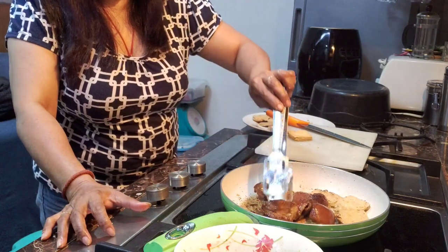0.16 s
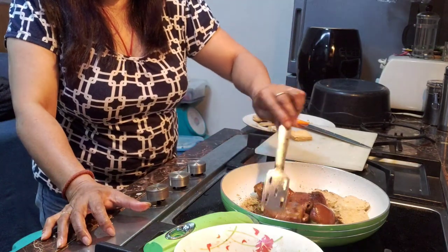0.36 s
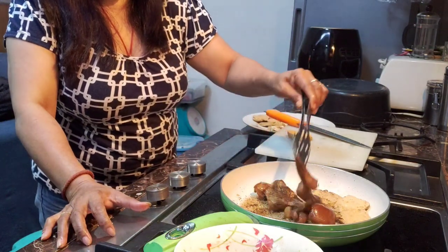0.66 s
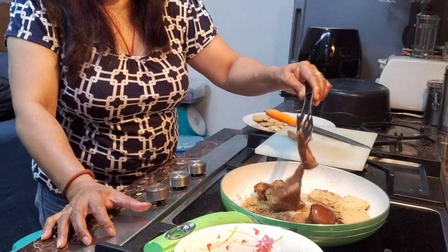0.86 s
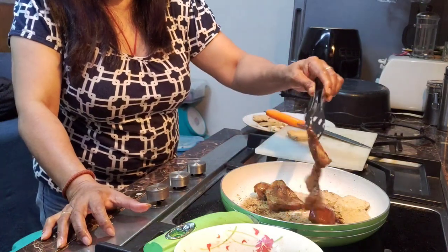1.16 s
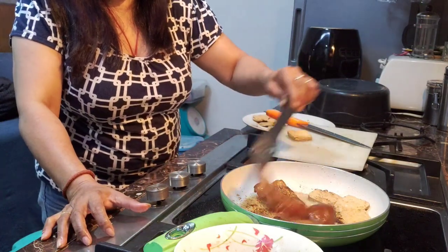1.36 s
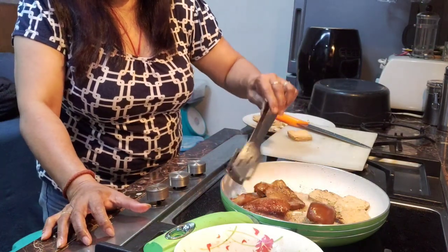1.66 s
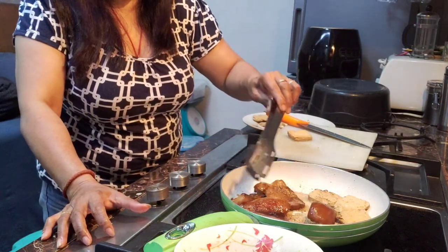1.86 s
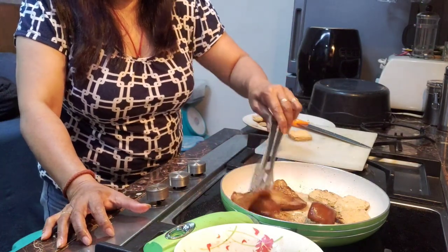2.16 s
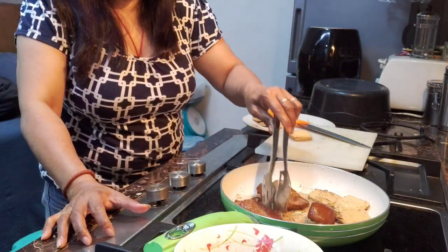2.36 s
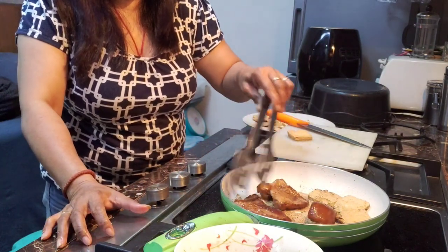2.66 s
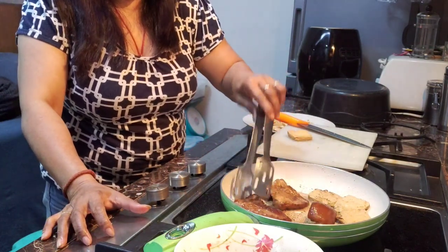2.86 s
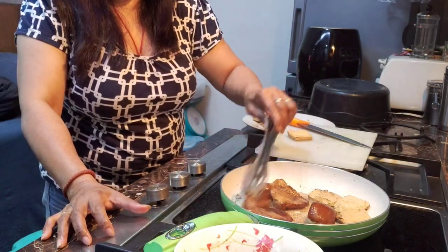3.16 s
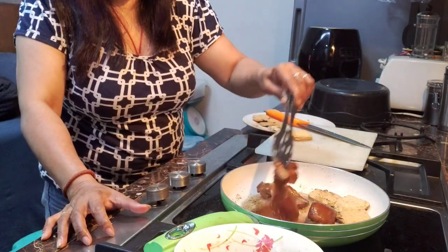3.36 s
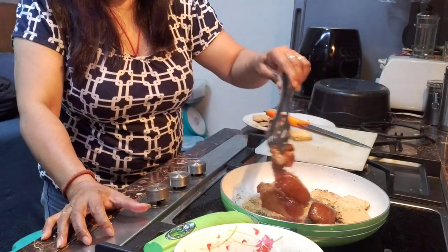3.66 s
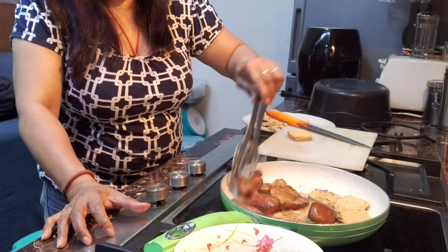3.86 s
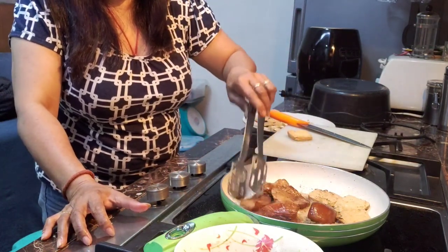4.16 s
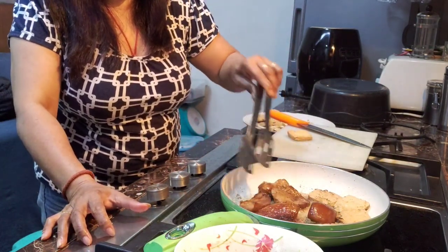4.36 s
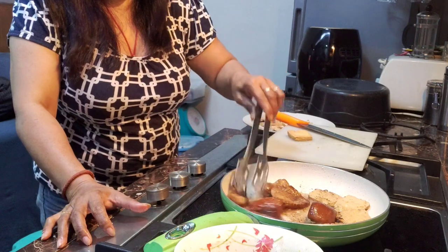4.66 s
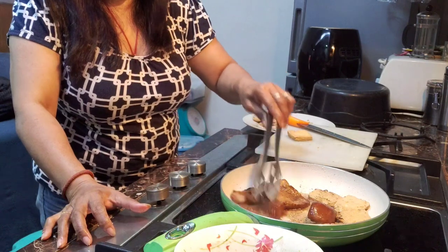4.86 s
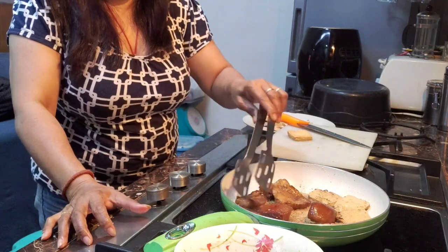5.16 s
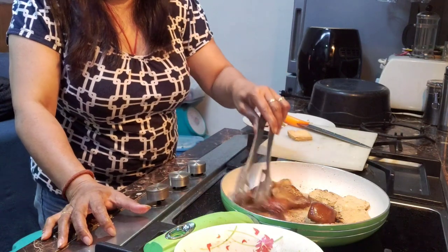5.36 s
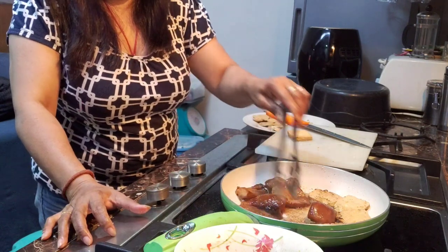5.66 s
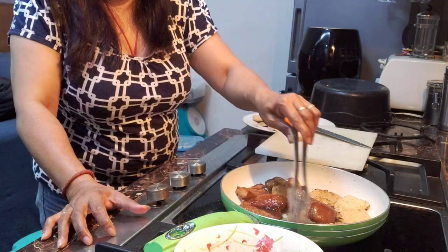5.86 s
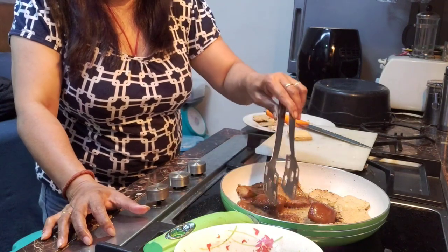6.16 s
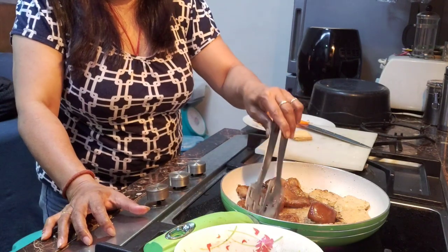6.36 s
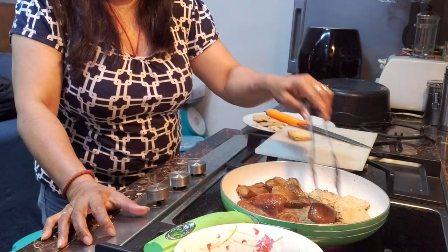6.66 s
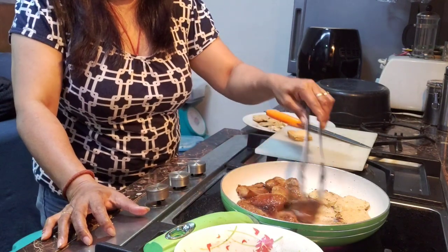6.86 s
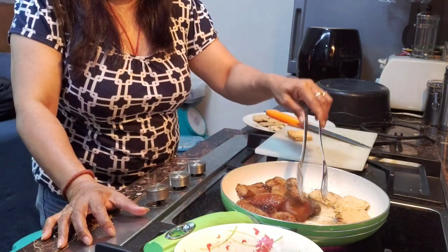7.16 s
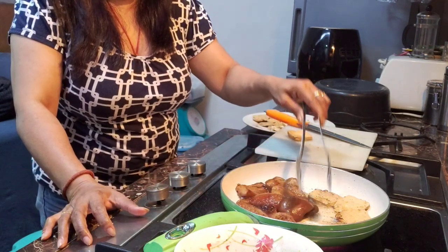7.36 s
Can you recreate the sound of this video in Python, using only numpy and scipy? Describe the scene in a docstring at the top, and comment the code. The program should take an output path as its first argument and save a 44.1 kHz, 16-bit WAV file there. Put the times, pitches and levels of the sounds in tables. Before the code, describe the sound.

Steel tongs clink and knock on a pan of frying food as the hissing oil settles to a soft sizzle.

```python
"""Steel tongs turn food in a frying pan in a small kitchen. They knock the pan four times, making it
ring, and in between they lightly touch it, scrape it and squeak on its enamel. The oil hisses and
spits as tiny steam bubbles burst, loudly at first, then softly. Behind it all is the low hum of
appliances, and the room adds a short echo."""
import sys
import numpy as np
from scipy import signal
from scipy.fft import rfft, irfft, next_fast_len
from scipy.io import wavfile
from scipy.ndimage import uniform_filter1d

SR = 44100
rng = np.random.default_rng(int(sys.argv[2]) if len(sys.argv) > 2 else 0)


def to_wav(s):
    """Save 16-bit WAV."""
    ch = np.atleast_2d(s).T  # columns
    pcm = np.round(np.clip(ch, -1, 1) * 32767)  # PCM
    wavfile.write(sys.argv[1], SR, pcm.astype(np.int16))


N = 330750  # 7.5 seconds


def gain_of(db):
    """Turns decibels into a number to multiply by."""
    return 10 ** (np.asarray(db) / 20)


def unit_level(x):
    """Scales a signal to an average power of 1."""
    return x / np.sqrt(np.mean(x ** 2) + 1e-20)


def value_at(points, hz):
    """Reads between the rows of a (pitch, value) table."""
    pitches, values = np.transpose(points)
    return np.interp(np.log(hz + 1), np.log(pitches + 1), values)


def add(mix, start_s, sound):
    """Mixes a sound in at its start time."""
    part = mix[..., round(start_s * SR):][..., :sound.shape[-1]]
    part += sound[..., :part.shape[-1]]


def resonate(x, hz, width_hz):
    """Rings at one pitch; a smaller width rings longer."""
    pole = np.exp((2j * np.pi * hz - np.pi * width_hz) / SR)
    return 2 * signal.lfilter([1 - abs(pole)], [1, -pole], x).real


def shape_tone(x, db_at):
    """Turns each pitch up or down by db_at(pitch) decibels."""
    size = next_fast_len(x.shape[-1])
    gains = gain_of(db_at(np.fft.rfftfreq(size, 1 / SR)))
    return irfft(rfft(x, size) * gains, size)[..., :x.shape[-1]]


# How alike the two ears hear each pitch (1 is the same, 0 is unrelated): pitch_hz, likeness
EAR_LIKENESS = [(60, 0.94), (160, 0.98), (420, 0.88), (1110, 0.089), (2930, 0.089), (7760, -0.33)]

def restless_noise(tone, patchy_db, patch_s, patch_hz, flicker_db, size, drift_db=0):
    """Stereo noise with louder and softer patches, a quick flicker and, if asked, a drifting tone."""
    hop, hz = size // 4, np.fft.rfftfreq(size, 1 / SR)
    left_re, left_im, other_re, other_im, patches = rng.standard_normal((N // hop + 5, len(hz), 5)).T
    for _ in range(2):  # smooth across pitch, then across time
        patches = uniform_filter1d(patches, max(1, round(patch_hz / hz[1])), 0)
        patches = uniform_filter1d(patches, max(1, round(patch_s * SR / hop)), 1)
    drift = unit_level(uniform_filter1d(uniform_filter1d(patches, 12, 0), 25, 1))
    flicker = unit_level(uniform_filter1d(rng.standard_normal(patches.shape[1]), size=2))
    alike = np.clip(value_at(EAR_LIKENESS, hz), -1, 1)[:, None]
    left, other = left_re + 1j * left_im, other_re + 1j * other_im
    spectrum = np.array([left, alike * left + np.sqrt(1 - alike ** 2) * other])
    wobble_db = patchy_db * unit_level(patches) + drift_db * drift + flicker_db * flicker
    spectrum *= gain_of(value_at(tone, hz)[:, None] + wobble_db)
    return unit_level(signal.istft(spectrum, nperseg=size, noverlap=size - hop)[1][:, :N])


# How long the room's echo takes to fade by 60 dB: pitch_hz, fade_s
ECHO_FADES = [(100, 0.27), (800, 0.3), (3000, 0.39), (8000, 0.18)]

def room_echo(x):
    """Many small reflections, each pitch fading at its own speed; the ears share the bass."""
    reflections = np.zeros((2, SR // 2))
    slots = np.arange(120, SR // 2 - 20, 20)
    arrivals = slots + rng.integers(0, 20, (2, len(slots)))
    np.put_along_axis(reflections, arrivals, rng.choice([-1., 1.], arrivals.shape), 1)
    hz, t, spectrum = signal.stft(reflections, SR, nperseg=256)
    alike = np.clip(value_at(EAR_LIKENESS, hz), 0, 1)[:, None]
    spectrum[1] = alike * spectrum[0] + np.sqrt(1 - alike ** 2) * spectrum[1]
    fade = gain_of(-60 * t / value_at(ECHO_FADES, hz)[:, None])
    tail = signal.istft(spectrum * fade, SR, nperseg=256)[1]
    return signal.fftconvolve(np.atleast_2d(x), tail / np.linalg.norm(tail[0]), axes=1)[:, :N]


# The notes the appliances hum: pitch_hz, width_hz, level_db
HUM_NOTES = [(48.3, 2.7, -80.5), (100, 15, -68.5), (123.8, 16, -69.5), (238.7, 2.1, -67.5),
             (239.2, 14.5, -65.5), (680, 11, -78.5), (1110, 8, -85.5)]
# The tone of the room's airy hush: pitch_hz, relative_db
HUSH_TONE = [(15, -41), (25, -21), (102, -7.5), (187, -5), (238, -3), (327, -14.5), (481, -17), (692, -9),
             (763, -12), (1120, -21), (1370, -27.5), (3270, -31.5), (5180, -26.5), (6600, -26),
             (7800, -17.5), (8250, -40), (10700, -69.5)]

def kitchen_hum():
    """Appliances hum on a few wavering notes over a soft hush."""
    shakes = rng.standard_normal((len(HUM_NOTES), N))
    hum = sum(gain_of(db) * unit_level(resonate(resonate(shake, hz, width), hz, width))
              for (hz, width, db), shake in zip(HUM_NOTES, shakes))
    hush = restless_noise(HUSH_TONE, 2.55, patch_s=0.05, patch_hz=60, flicker_db=0.64, size=2048)
    return hum + gain_of(-62) * hush


def bubbles(tone, per_s, spread_db, sharpness):
    """Steam bubbles burst as short rings of random pitch and size, heard with the room's echo."""
    pitches = np.geomspace(tone[1][0], tone[-3][0], num=15)
    sizes = gain_of(spread_db * np.minimum(rng.exponential(1, N), 2.3))
    bursts = sizes * (rng.random(N) < per_s / SR)
    which_pitch = rng.integers(0, len(pitches), N)
    pops = np.zeros(N)
    for k, hz in enumerate(pitches):
        ring = resonate(bursts * (which_pitch == k), hz, hz / sharpness)
        pops += gain_of(value_at(tone, hz)) * resonate(ring, hz, 260)
    direct = np.array([pops, np.roll(pops, 17)])  # the pan is nearer the left ear
    return unit_level(direct + 1.56 * room_echo(direct))


# How hard the oil fries: fierce while a piece is lifted, then a simmer that turning revives.
# time_s, fizz_db, bubbling_above_fizz_db
FRYING_LEVELS = [(0.0, -37.5, 0.5), (0.199, -43.5, 1), (0.401, -39, -4), (0.612, -40, -3.5),
                 (0.691, -40, -3.5), (0.76, -41.5, 1), (0.871, -37.5, -6), (0.96, -43, -5.5),
                 (1.091, -44.5, -7), (1.19, -57, -0.5), (1.259, -50, -7.5), (1.498, -56.5, -5),
                 (1.748, -63, -5.5), (2.25, -63, 3.5), (2.398, -52, -5.5), (2.9, -54, -3),
                 (3.13, -46.5, -13), (3.302, -58.5, -2), (3.701, -54.5, -9), (3.97, -56, -7),
                 (4.298, -56.5, -3.5), (4.802, -63.5, -9), (5.201, -63, 0), (5.502, -62, -8),
                 (5.901, -62.5, -5.5), (6.5, -58.5, -10.5), (6.752, -68.5, 4), (7.102, -60, -16),
                 (7.5, -60.5, -5.5)]
# The tones of the fine fizz and the coarse bubbling: pitch_hz, relative_db
FIZZ_TONE = [(2940, -52), (5000, -1), (5240, -22.5), (5440, -8), (6180, 7), (6910, 8.5), (7160, -7.5),
             (7350, 7.5), (8020, -15.5), (8300, -36), (10700, -51.5), (18100, -120)]
BUBBLING_TONE = [(880, -73), (1550, -29.5), (1950, -14), (2370, -8), (2760, -9), (3030, -0.5), (4570, -4.5),
                 (5000, -8.5), (5400, -17.5), (7020, -31.5), (11900, -120)]
# Where the hot pan sings along with the bubbles: pitch_hz, width_hz, boost_db
PAN_SINGING = [(2530, 18, 13.5), (3293, 290, 5), (4140, 25, 7.5), (4570, 110, 3), (5480, 110, 12),
               (5660, 300, 7.5), (6460, 91, 6), (6980, 140, 6.5), (7140, 89, 3.5)]

def sizzling_oil():
    """Hot oil hisses and pops; lively frying is even, quiet frying breaks up into patches."""
    times, fizz_db, bubbling_db = np.transpose(FRYING_LEVELS)
    frame_times = np.arange(N // 256 + 5) * 256 / SR
    patchy_db = np.clip(6.5 - 0.3 * (np.interp(frame_times, times, fizz_db) + 55), 2, 9)
    fizz = restless_noise(FIZZ_TONE, 0.9 * patchy_db, 0.04, 80, flicker_db=3.4, size=1024)
    fizz += 0.5 * bubbles(FIZZ_TONE, per_s=300, spread_db=7, sharpness=84)
    bubbling = restless_noise(BUBBLING_TONE, 1.21 * patchy_db, 0.028, 130,
                              flicker_db=2.1, size=1024, drift_db=2.0)
    bubbling += 0.47 * bubbles(BUBBLING_TONE, per_s=350, spread_db=7.3, sharpness=22)
    t = np.arange(N) / SR
    loudness = gain_of(np.interp(t, times, fizz_db))
    bubbling_gain = gain_of(np.interp(t, times, bubbling_db))
    oil = loudness * (unit_level(fizz) + bubbling_gain * unit_level(bubbling))
    return shape_tone(oil, lambda hz: sum(db / (1 + (2 * (hz - pitch) / width) ** 2)
                                          for pitch, width, db in PAN_SINGING) - 3.0)


def rub(db, hz, width_hz, contact_s, rise_s=0.0025):
    """Rough contact makes the pan ring around one pitch, which dies soon after the tips lift."""
    t = np.arange(round((contact_s + 0.25) * SR)) / SR
    onset = np.minimum(t / rise_s, 1) * (1 + 0.33 * np.exp(-t / 0.0017))
    fade = gain_of(-60 * np.maximum(t - contact_s, 0) / 0.066 - 56.5 * t)
    left, other, grip = rng.standard_normal((3, SR // 2))[:, :len(t)]
    stick_and_slip = gain_of(3.03 * unit_level(uniform_filter1d(uniform_filter1d(grip, 220), 220)))
    alike = np.clip(value_at(EAR_LIKENESS, hz) + 0.23, 0, 1)
    friction = np.array([left, alike * left + np.sqrt(1 - alike ** 2) * other])
    ring = unit_level(resonate(resonate(friction, hz, width_hz), hz, 0.59 * width_hz))
    return gain_of(db) * onset * fade * stick_and_slip * ring


# Light touches of the tongs and spits of oil: start_s, level_db, pitch_hz, contact_s
LIGHT_TOUCHES = [(1.211, -56, 6540, 0.088), (1.27, -50, 4290, 0.018), (1.328, -52.5, 6370, 0.036),
                 (1.369, -53, 4800, 0.0073), (1.477, -57, 6840, 0.0049), (1.491, -56.5, 3370, 0.012),
                 (1.543, -56, 3294, 0.016), (1.558, -51.5, 6400, 0.021), (1.596, -51.5, 4080, 0.006),
                 (1.727, -56, 6430, 0.24), (1.935, -56, 4870, 0.029), (1.955, -59, 6440, 0.044),
                 (2.079, -56.5, 5900, 0.0039), (1.972, -55, 3374, 0.036), (2.113, -58, 3135, 0.078),
                 (2.245, -51.5, 6510, 0.046), (2.288, -42.5, 5600, 0.025), (2.4, -55, 6710, 0.019),
                 (2.452, -60.5, 1800, 0.018), (2.261, -48, 126, 0.037), (2.415, -48, 870, 0.033),
                 (2.525, -52, 851, 0.25), (2.69, -57.5, 890, 0.031), (3.034, -54, 560, 0.018),
                 (3.043, -60, 1800, 0.11), (3.036, -54, 4570, 0.031), (3.095, -52.5, 4570, 0.035),
                 (3.301, -57.5, 6760, 0.075), (3.446, -60.5, 4960, 0.035), (3.47, -56.5, 6360, 0.072),
                 (3.657, -53.5, 6960, 0.098), (3.733, -58, 4540, 0.032), (3.733, -62, 3160, 0.012),
                 (3.765, -48, 6400, 0.015), (3.804, -63, 5440, 0.042), (3.416, -48.5, 115, 0.056),
                 (3.526, -50, 6570, 0.02), (3.807, -46.5, 6420, 0.0036), (3.899, -50.5, 112, 0.017),
                 (4.006, -53.5, 285, 0.01), (4.315, -55, 6360, 0.11), (4.375, -53.5, 6550, .015),
                 (4.416, -60, 1870, 0.03), (4.438, -54, 6750, 0.0079), (4.669, -60, 5780, .04),
                 (4.734, -58, 5600, 0.023), (4.854, -58.5, 5600, 0.039), (4.885, -57.5, 3250, 0.015),
                 (5.039, -54.5, 4480, 0.006), (5.166, -61, 867, 0.031), (5.195, -58.5, 3320, 0.029),
                 (5.216, -59, 4210, 0.033), (5.235, -59.5, 554, 0.035), (5.288, -69, 3450, 0.058),
                 (5.316, -53, 5600, 0.0088), (5.323, -67, 1070, 0.046), (5.43, -55.5, 5810, 0.017),
                 (5.539, -54.5, 6530, 0.057), (5.625, -49, 6460, 0.0069), (5.632, -60, 528, 0.025),
                 (5.763, -62.5, 1087, 0.043), (5.838, -56, 100, 0.037), (6.291, -53.5, 6400, 0.04),
                 (6.014, -56, 6460, 0.06), (6.014, -56, 5980, 0.029), (6.101, -52.5, 6460, 0.0069),
                 (6.177, -55.5, 6450, 0.01), (6.405, -57, 6420, 0.18), (6.471, -54, 5740, 0.022),
                 (6.965, -57, 6620, 0.012), (7.168, -63.5, 521, 0.068), (7.256, -55, 6270, 0.01),
                 (7.389, -52.5, 6380, 0.056)]

def add_touches(mix):
    """Each touch or spit stirs a small ring; higher ones ring less cleanly."""
    for start_s, db, hz, contact_s in LIGHT_TOUCHES:
        width_hz = 39.7 + 76 * (hz / 1000) ** 0.56
        add(mix, start_s, rub(db, hz, width_hz, contact_s))


# The tips sliding on the pan: start_s, level_db, pitch_hz, contact_s
TONG_SCRAPES = [(1.426, -55.5, 3440, 0.019), (2.695, -50.5, 3430, 0.023), (5.075, -58, 3250, 0.018),
                (2.521, -55, 1620, 0.043), (2.525, -56, 3640, 0.022), (3.034, -46, 6460, 0.015),
                (3.369, -59.5, 2650, 0.0044), (3.735, -55, 5600, 0.028), (4.378, -59.5, 4130, 0.065),
                (6.732, -55.5, 3290, 0.016), (6.27, -64.5, 3480, 0.068), (6.925, -57, 3180, 0.15)]

def add_scrapes(mix):
    """Sliding tips make a broad rasp; long slides swell."""
    for start_s, db, hz, contact_s in TONG_SCRAPES:
        add(mix, start_s, rub(db, hz, 0.27 * hz, contact_s, rise_s=2.3 * contact_s ** 2))


# The tips squeaking on the pan: start_s, level_db, pitch_hz, contact_s
TONG_SQUEAKS = [(5.468, -57, 909, 0.11), (6.413, -64, 2065, 0.16), (6.645, -64.5, 2384, 0.16)]

def add_squeaks(mix):
    """Steel rubbing on enamel makes a thin, narrow note."""
    for start_s, db, hz, contact_s in TONG_SQUEAKS:
        add(mix, start_s, rub(db, hz, width_hz=60, contact_s=contact_s))


# The notes the struck pan and tongs ring at: pitch_hz, relative_db, ring_s (larger rings longer)
METAL_NOTES = [(137, -1.5, 0.048), (299.3, 13, 0.19), (396, -9.5, 0.49), (459.5, 2.5, 0.045),
               (491, -5, 0.69), (839, -7.5, 0.15), (833, -4, 0.15), (890, -12.5, 0.24), (1542, -1.5, 0.026),
               (1620, 4.5, 0.029), (1800, -3.5, 0.07), (1987, 1.5, 0.1), (2850, -2, 0.031),
               (4080, -6, 0.039), (4390, -2.5, 0.1), (4706, 3, 0.077), (4970, -3, .07), (5600, -0.5, 0.034),
               (5820, -9, 0.069), (6230, 10, 0.032), (6850, 6.5, 0.085), (6990, 5.5, 0.18), (7550, 4, 0.14)]
# The tone of the crack as metal meets metal: pitch_hz, relative_db
CRACK_TONE = [(300, -16), (800, -18), (1150, -16.5), (1700, -6.5), (6500, 0), (8000, -16)]

def knock(contact_s, shift_percent, snap_db, lead_s):
    """The tips chatter on the metal and set it ringing over a short crack, after lead_s of quiet."""
    t = np.arange(-round(lead_s * SR), round(0.5 * SR)).clip(0) / SR
    chatter = gain_of(4.3 * unit_level(uniform_filter1d(rng.standard_normal(len(t)), 60)))
    shared, left, right = rng.standard_normal((3, len(t)))
    onset = np.minimum(t / 0.00087, 1) * (1 + 1.17 * np.exp(-t / 0.0028))
    since_lift = np.maximum(t - contact_s, 0)
    press, rattle = gain_of(-60 * since_lift / 0.047), gain_of(-15 - 60 * since_lift / 0.17)
    blow = unit_level(shared + 0.67 * np.array([left, right])) * chatter * onset * (press + rattle)
    ringing = np.zeros_like(blow)
    for hz, db, ring_s in METAL_NOTES:
        lag_s = 2.168 / (hz + 200)  # low notes start a little later
        late_blow = np.roll(blow, round(lag_s * SR), 1)
        ring = resonate(late_blow, hz * (1 + shift_percent / 100), 4.75 / ring_s)
        ringing += gain_of(db) * ring / abs(ring).max()
    snap = 1 + gain_of(snap_db) * np.exp(-t / 0.0046)
    crack = shape_tone(blow * snap, lambda hz: value_at(CRACK_TONE, hz))
    return ringing + gain_of(1.5) * crack


# The four knocks: start_s, thud_db, body_db, ring_db, clack_db, tick_db, clink_db, top_clink_db,
# left_minus_right_db, contact_s, pitch_shift_percent, snap_db
TONG_KNOCKS = [(2.303, -49, -44.5, -23.5, -38.5, -33, -39.5, -37, 2.5, 0.008, 0, 8),
               (4.13, -50, -37.5, -45, -43.5, -54.5, -50, -44, -2.7, 0.015, -0.8, 9),
               (5.137, -80, -49, -41, -53, -61, -56, -55.5, 1.5, 0.013, 3, 6),
               (6.546, -79, -56, -52.5, -41, -67, -37, -43.5, 4, 0.013, 0.5, 6.5)]
# The middle of each of the seven ranges, from thud to top clink: pitch_hz
KNOCK_RANGES = [250, 470, 860, 1800, 3000, 4400, 6600]

def add_knocks(mix, lead_s=0.02):
    """The tongs strike the pan, each time with its own tone and left-right balance."""
    for start_s, *levels_db, side_db, contact_s, shift_percent, snap_db in TONG_KNOCKS:
        tone = list(zip(KNOCK_RANGES, levels_db))
        hit = knock(contact_s, shift_percent, snap_db, lead_s)
        hit = shape_tone(hit, lambda hz: value_at(tone, hz))
        add(mix, start_s - lead_s, hit * gain_of([[side_db / 2], [-side_db / 2]]))


def scene():
    """The tongs and their echo, over the frying oil and the kitchen's hum."""
    tongs = np.zeros((2, N))
    add_knocks(tongs)
    add_touches(tongs)
    add_scrapes(tongs)
    add_squeaks(tongs)
    direct = np.array([np.roll(tongs[0], 4), tongs[1]])  # the rim is a little nearer the right ear
    return direct + gain_of(-5.5) * room_echo(tongs) + sizzling_oil() + kitchen_hum()


# How much louder the left microphone is than the right: pitch_hz, left_minus_right_db
MIC_BALANCE = [(60, 1), (250, 0.5), (500, 1.5), (850, 2.5), (1320, -2), (2060, 1), (3210, -2.5),
               (4500, -3.5), (5500, 7.5), (7000, 13), (7700, -6.5), (8200, -5)]

def record(dry):
    """The two microphones favour different pitches, and the highest treble is cut off."""
    left = shape_tone(dry[0], lambda hz: value_at(MIC_BALANCE, hz) / 2)
    right = shape_tone(dry[1], lambda hz: -value_at(MIC_BALANCE, hz) / 2)
    treble_cut = signal.firwin(1023, cutoff=8290, window=("kaiser", 9), fs=SR)
    return signal.oaconvolve(np.array([left, right]), treble_cut[None], "same")


dry = scene()
out = record(dry)
to_wav(out)
```